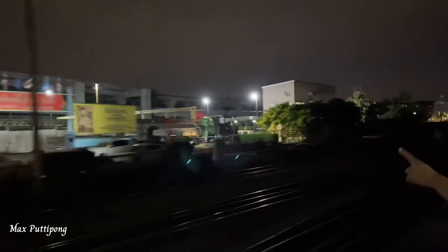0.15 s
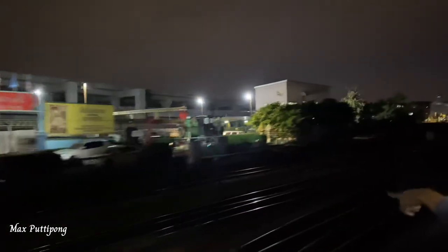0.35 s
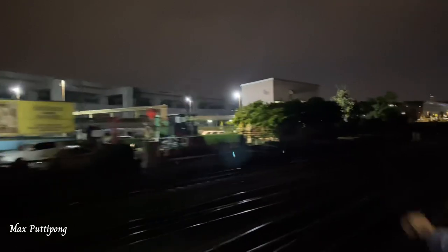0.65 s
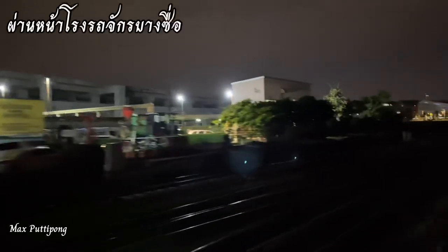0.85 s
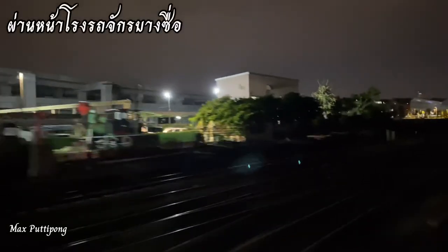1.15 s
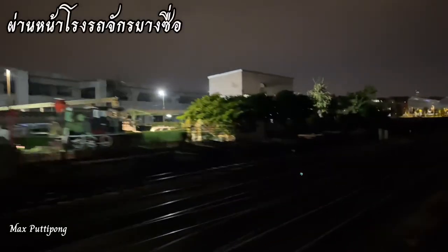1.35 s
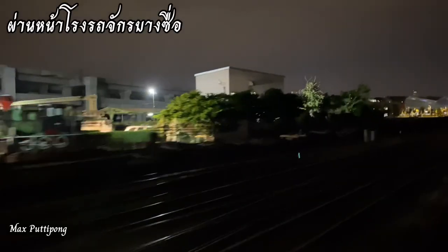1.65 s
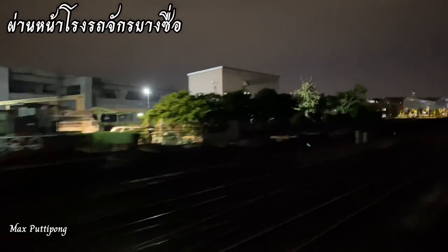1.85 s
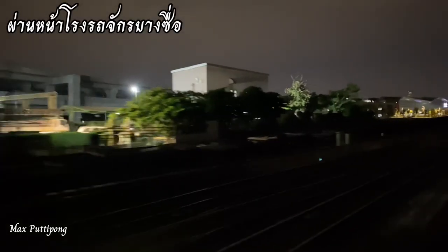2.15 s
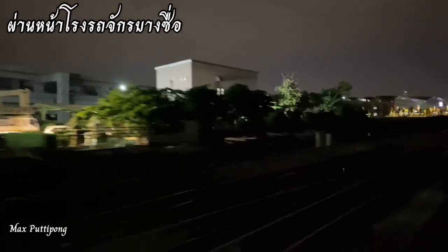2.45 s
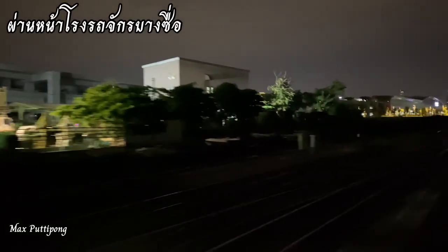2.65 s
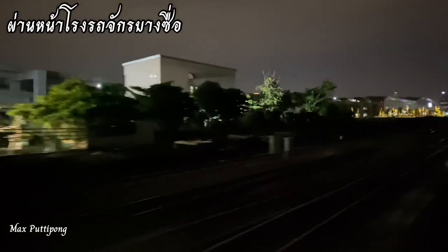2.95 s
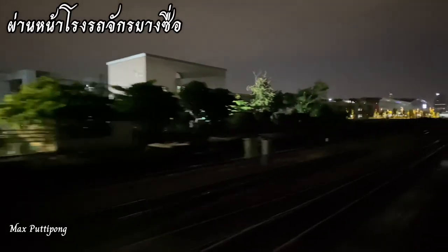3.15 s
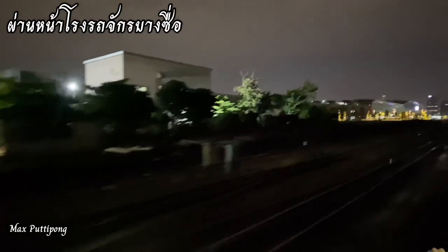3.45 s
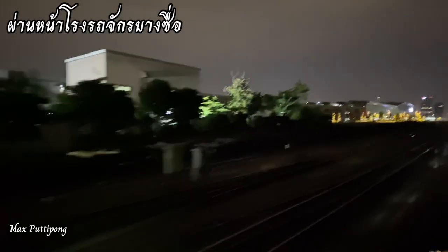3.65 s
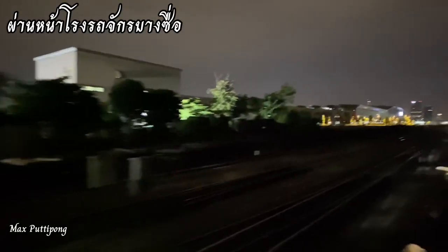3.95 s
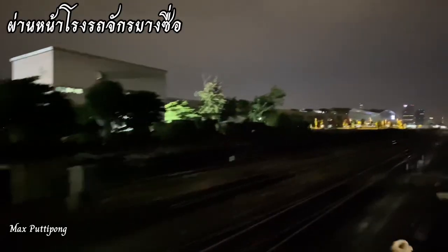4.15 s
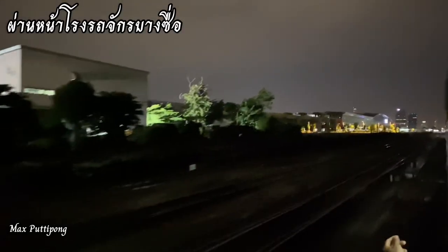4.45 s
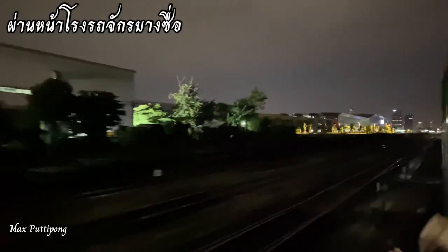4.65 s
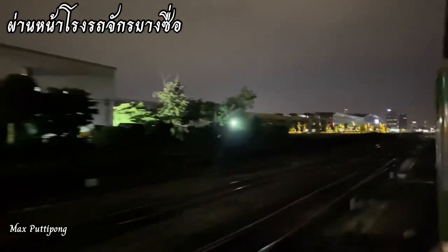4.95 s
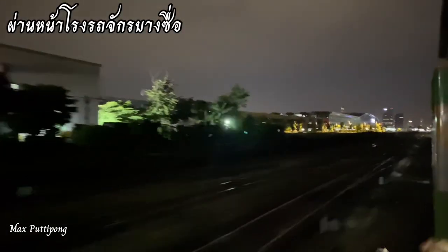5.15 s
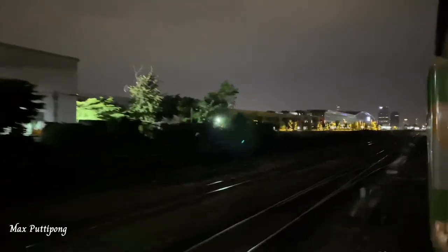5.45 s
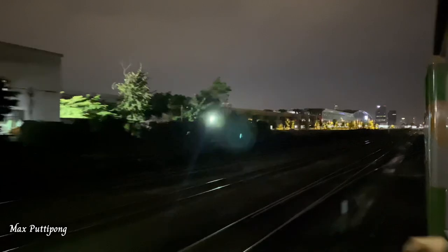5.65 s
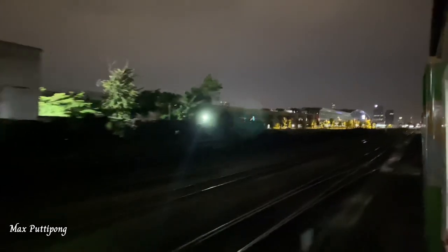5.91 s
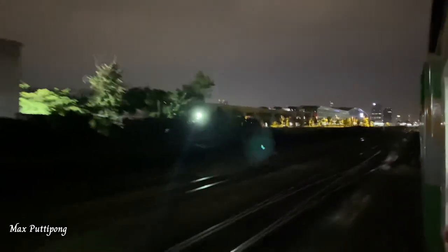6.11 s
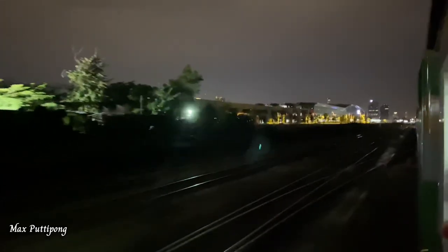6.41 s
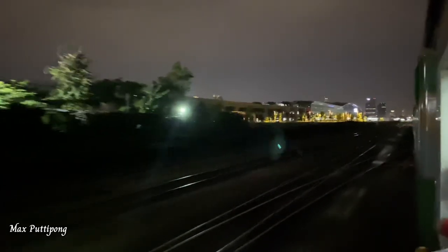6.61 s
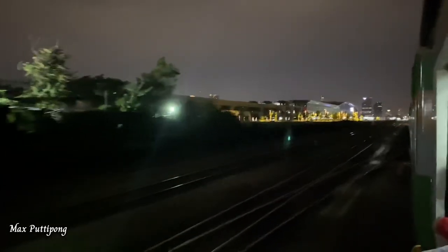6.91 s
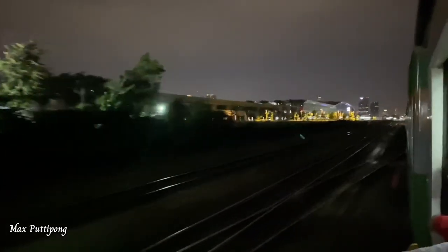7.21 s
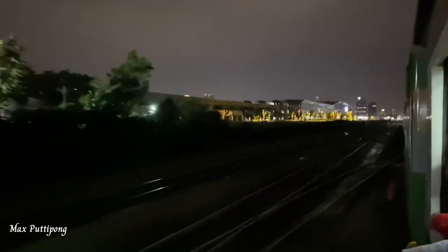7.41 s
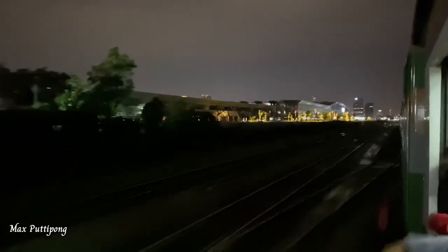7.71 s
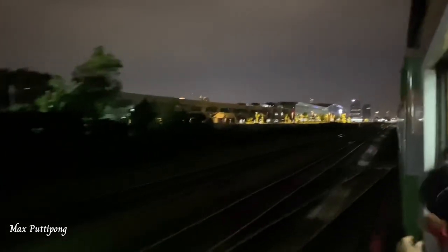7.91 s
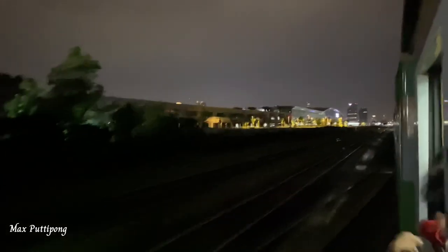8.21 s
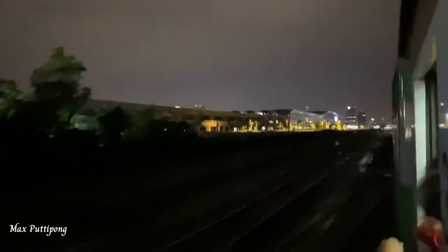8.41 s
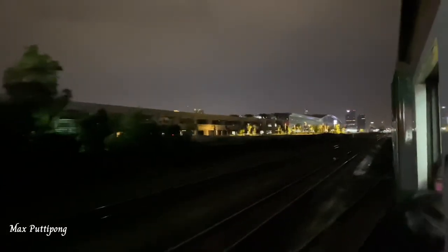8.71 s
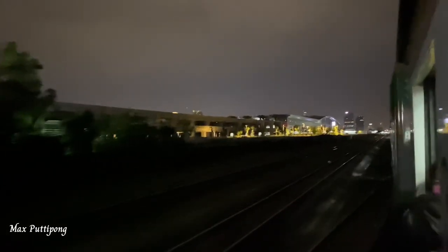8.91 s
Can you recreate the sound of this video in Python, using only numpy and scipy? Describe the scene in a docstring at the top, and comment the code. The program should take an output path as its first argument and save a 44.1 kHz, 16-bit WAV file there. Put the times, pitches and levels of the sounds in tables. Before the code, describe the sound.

Low uneven train rumble and soft wheel roar, with irregular joint clanks, dull thumps and knocks, rattling metal and tiny high squeaks.

```python
"""A train rolls slowly through a yard, heard at an open carriage window.
Throughout, shaped noise makes sway, rumble, growl, wheel roar, rail hiss and body boom; fittings chatter.
From the first moment damped tones throb in the panels, and from 0.4 s noise bursts thump as jolts.
From 0.44 s wheels hit rail joints: clank, decaying ring, clatter; loose links ring and slack knocks.
From 0.95 s flanges squeak as short sines; the rumble weakens after 4.2 s, the joints go on to the end."""
import sys
import numpy as np
from scipy import signal
from scipy.fft import rfft, irfft, next_fast_len
from scipy.io import wavfile
from scipy.ndimage import uniform_filter1d

SR = 44100
rng = np.random.default_rng(int(sys.argv[2]) if len(sys.argv) > 2 else 0)


def wav_record(signal):
    """Record a signal, one row per channel, as 16-bit PCM in the file named by sys.argv[1]."""
    frames = np.transpose(np.atleast_2d(signal))
    bounded = np.clip(frames, -1, 1)
    # unit amplitude maps onto the largest positive 16-bit level
    quanta = np.round(bounded * 32767).astype(np.int16)
    wavfile.write(sys.argv[1], SR, quanta)


N = 399987
TIME = np.arange(N) / SR  # s

# Noise spectra of the layers. Each row: frequency in Hz, relative density in dB per Hz.
# Slow heave of the carriage on its springs, running gear, bogie frame.
SWAY_SPECTRUM = [(15, -32), (30, -2), (45, 13.5), (62, 17.5), (80, 19), (150, -56)]
RUMBLE_SPECTRUM = [(35, -17), (60, -1.5), (80, 1), (135, 2.5), (200, -5.5), (300, -8.5), (600, -32.5),
                   (1500, -79)]
GROWL_SPECTRUM = [(200, -19), (400, 3.5), (470, 3), (640, -5.5), (800, -10), (1100, -23.5), (2000, -95)]
# Car body boom, and its narrower drone; columns as above, [Hz] and [dB per Hz].
BOOM_SPECTRUM = [(100, -16.5), (175, -2.5), (270, -7), (390, -7), (500, -17), (750, -16), (3000, -71)]
DRONE_SPECTRUM = [(120, -16), (200, -8.5), (295, -3), (380, -7), (500, -21.5), (750, -19.5), (3000, -72)]
# Wheels on the rail head: roar and hiss; columns as above, [Hz] and [dB per Hz].
ROAR_SPECTRUM = [(300, -28), (600, 1.5), (880, 0.5), (1150, -2.5), (1500, -7), (1750, -9.5), (2600, -11),
                 (3600, -14), (6000, -23), (12000, -114)]
HISS_SPECTRUM = [(1200, -20), (2800, -2.5), (4200, 0), (5800, -2.5), (7400, -3.3), (9000, -10),
                 (10300, -6.5), (11800, -3), (13200, -8), (15500, -8.5)]
# Jolt, joint blow, loose steel gear and its smallest parts; columns as above, [Hz] and [dB per Hz].
THUD_SPECTRUM = [(20, -46), (55, 11.5), (150, 2), (310, 4.5), (500, -5.5), (1000, -27), (3000, -77)]
CLANK_SPECTRUM = [(100, -25), (300, 13.5), (600, 8), (1000, 4), (1200, -4.5), (1550, -12), (1900, -13),
                  (4000, -11), (12000, -91)]
CLATTER_SPECTRUM = [(300, -12), (550, 1.5), (850, 3), (1250, -1.5), (1550, 0), (1800, -2.5), (2600, -1),
                    (3600, -4), (5000, -5), (7500, -11.5), (9000, -18), (11500, -16), (15500, -22)]
RATTLE_SPECTRUM = [(1500, -30), (4000, -1), (7000, 0), (9000, -4), (11500, -1.5), (15500, -8)]

# Resonances standing out of the spectra. Each row: frequency in Hz, width in Hz, lift in dB.
BODY_MODES = [(169, 89, 2.5), (241.4, 31, 4.5), (298.4, 28, 10), (337.5, 8.9, 10.5)]
WHEEL_MODES = [(618, 44, 6.4), (954, 32, 4.7), (1350, 74, 5.9), (1516, 57, 6.6), (2065, 170, 5.3),
               (2735, 58, 6.6), (3400, 110, 2.2)]
GEAR_MODES = [(1350, 330, 6.1), (2090, 100, 4.9), (2800, 180, 0.78)]
# Modes of the loose steel links. Each row: frequency in Hz, relative level in dB, t60 in seconds.
STEEL_MODES = [(1530, 3, 0.061), (1840, 0, .045), (2000, 0, 0.065), (2330, 4.5, .06), (2675, 5, 0.056),
               (3090, -5, .06), (3800, -1, .05), (4250, -1, .05), (4800, -4, 0.051)]
# Longer ring of the wheel rim. Each row: frequency in Hz, relative level in dB.
RIM_MODES = [(824, 0), (1310, -6), (1510, -8.5)]

# Likeness of the left and right channels. Each row: frequency in Hz, correlation from 0 to 1.
LIKENESS = [(50, .95), (125, .87), (290, .78), (600, .54), (1300, .43), (2200, .32), (4000, .46),
            (7000, .5), (11000, .8)]
# Left minus right. Each row: frequency in Hz, difference in dB.
BALANCE = [(60, 0), (125, 1), (270, 2), (700, .5), (1200, .8), (2200, 2.3), (4500, 1.7), (8000, 0)]
# Phase by which left leads right. Each row: frequency in Hz, lead in radians.
LEAD = [(1290, 0), (1720, .8), (3300, .2), (7500, 0), (9500, -1.85)]

# Shaking of the running gear by the track. Each row: time in seconds, relative levels of rumble
# and deep sway in dB.
SHAKE = [(0, -17, -16.5), (.5, -13.5, -17), (1.2, -18.5, -29), (1.95, -14.5, -17), (2.35, -14, -15.5),
         (2.72, -14, -24.5), (2.8, -22, -42), (3.36, -17, -39), (3.46, -14, -21), (4.2, -14.5, -25),
         (4.28, -23, -25), (5.25, -27.5, -29.5), (5.8, -27, -25.5), (6.6, -24, -26.5), (7.2, -29, -23),
         (7.95, -24, -48), (8.3, -18, -31), (8.6, -21, -45), (9.07, -23, -50)]
# Wheels on the rail head. Each row: time in seconds, relative levels of roar and hiss in dB.
ROLL = [(0, -29, -41.5), (1.3, -31.5, -46), (2.3, -29.5, -40), (3.2, -30.5, -42.5), (3.8, -29.5, -40),
        (4.25, -33, -46.5), (4.6, -31.5, -41), (5.8, -30, -43.5), (6.5, -28.5, -39.5), (7.2, -28, -38.5),
        (7.65, -28.5, -41), (8.3, -28.5, -43), (9.07, -28, -39.5)]
# Spells of car body drone. Each row: start in seconds, length in seconds, peak level in dB.
DRONES = [(-.1, 0.31, -20), (.25, 1.06, -17.5), (2.65, 0.43, -20.5), (6.25, 0.36, -19), (7.7, 1.65, -20.5)]
# Spells of bogie grinding. Each row: start in seconds, length in seconds, relative peak level in dB.
GRINDS = [(.235, .075, -13), (.3, 0.74, -25.5), (.765, .07, -19), (1.812, 0.041, -16), (2.5, 0.41, -27),
          (2.76, 0.21, -17), (2.975, 0.13, -16), (3.18, .1, -15.5), (4.88, 0.062, -20),
          (6.715, 0.07, -18.5), (8.1, 0.28, -22)]
# Body panel throbs. Each row: start in seconds, hold in seconds, pitch in Hz, relative level in dB.
THROBS = [(.01, 0.04, 302, -8.5), (0.356, 0.023, 310, -11), (0.623, .02, 303, -9.5),
          (0.941, .035, 290, -12), (2.418, 0.024, 71.6, -9), (3.454, 0.017, 75, -2),
          (4.492, 0.016, 320, -15), (4.738, 0.028, 327, -14), (6.44, 0.061, 321, -16),
          (7.211, 0.016, 311, -11.5), (8.311, 0.011, 396, -11.5), (8.435, 0.034, 320, -12.5),
          (8.601, 0.0089, 308, -12), (8.693, .03, 325, -13), (8.965, 0.026, 194, -10)]
# Bogie jolts. Each row: start in seconds, relative level in dB.
JOLTS = [(0.362, -11), (0.545, -10), (0.631, -13), (0.797, -10), (1.87, -12), (2.237, -13), (3.61, -5),
         (3.898, -6), (4.093, -6.5), (6.742, -14), (8.608, -16), (8.894, -8.5)]
# Knocks of slack in the bogie. Each row: start in seconds, relative peak in dB, pitch in Hz.
KNOCKS = [(0.54, -6, 445), (.645, -5, 624), (1.828, -3, 432), (5.59, -11, 700), (2.19, -14, 503),
          (2.244, -3.5, 595), (2.696, -14, 590), (3.194, -5, 590), (3.726, -14, 543), (3.898, -0.5, 467),
          (4.278, -2.5, 594), (4.409, -6.5, 470), (5.544, -6, 520), (5.641, -10, 800), (5.719, -15, 980),
          (6.318, -11.5, 990), (6.522, -7, 970), (6.752, -7, 630), (6.927, -14, 645), (7.119, -5, 754),
          (7.474, -6, 580), (8.778, -0.5, 830), (8.981, -3, 770)]
# Flange squeaks. Each row: start in seconds, nominal length in seconds, nominal pitch in Hz,
# relative level in dB, roughness from 0 to 1.
SQUEAKS = [(0.947, 0.034, 7500, -46, .3), (1.144, 0.037, 6570, -34, 0.3), (2.05, 0.16, 7430, -49, 0.35),
           (2.38, 0.097, 6315, -29.5, 0.22), (3.726, 0.037, 6700, -40, 0.7),
           (4.523, 0.065, 7440, -44, 0.25), (4.637, .055, 6400, -44, 0.4), (4.972, 0.035, 7400, -39, 0.25),
           (5.132, 0.043, 6880, -37, 0.3), (6.977, 0.016, 12500, -38, .8), (7.016, 0.056, 9970, -39.5, 0.4),
           (7.334, .03, 13500, -43, 0.8), (7.779, 0.025, 6150, -40.5, 0.65),
           (8.082, 0.035, 6760, -38.5, 0.9), (8.083, 0.044, 2360, -37, 0.7)]
# Loose links striking the frame. Each row: start in seconds, relative level in dB.
STROKES = [(.453, -29.5), (.542, -39), (.69, -31), (2.263, -30), (2.283, -29), (2.3, -29), (4.729, -32),
           (4.751, -34), (5.64, -35), (7.14, -31), (8.371, -25), (8.775, -21.5), (8.799, -29),
           (8.967, -22.5), (8.99, -29)]
# Wheels striking joints. Each row: start in seconds, relative clank level in dB, ring pitch in Hz,
# relative clatter level in dB, nominal clatter hold in seconds.
JOINTS = [(0.444, -19.5, 570, -27, 0.022), (0.649, -19.5, 1054, -30, 0.063), (1.631, -29, 575, -29, 0.011),
          (2.044, -21, 457, -31.5, 0.022), (2.245, -25, 603, -25.5, 0.06), (4.072, -23, 863, -38, .01),
          (4.492, -18, 900, -43, .022), (4.687, -17.5, 656, -28.5, 0.069), (5.363, -32, 1300, -34.5, 0.03),
          (5.76, -32, 820, -34.5, 0.11), (6.518, -18, 970, -37, 0.013), (6.924, -19, 1025, -31, 0.018),
          (7.116, -16.5, 856, -25.5, 0.065), (7.348, -33, 940, -32, 0.04), (7.963, -27, 726, -28.5, 0.011),
          (8.158, -23.5, 700, -30.5, 0.032), (8.368, -18, 649, -25, 0.011), (8.768, -15, 847, -24, 0.021),
          (8.964, -16.5, 588, -22.5, 0.058)]

# boom and growl levels at the reference shaking, and their slope in dB per dB of shaking
SHAKE_REF_DB = -18
BOOM_DB, BOOM_DB_PER_DB = -20, 0.4
GROWL_DB, GROWL_DB_PER_DB = -25, 0.32
# body boom after a joint: level against the clank, decay time
JOINT_BOOM_DB, JOINT_BOOM_S = -2, 0.02
# starting lags per second of clatter hold, and gain of the rattle with hold
CLATTER_LAG_S_PER_S = 0.072
RATTLE_LAG_S_PER_S, RATTLE_DB_PER_S = 0.18, 76
# link bounces: mean gap, level step per bounce, spread of mode strengths, pitch spread as a share
BOUNCE_S, BOUNCE_DB, STROKE_SPREAD_DB, DETUNE_SHARE = 0.006, -6, -5.5, .04
EDGE_HZ = 15900


def amp(db):
    """Decibels to gain."""
    return 10 ** (np.asarray(db) / 20)


def unit(x):
    """Scales to rms 1."""
    return x / np.sqrt(np.mean(x ** 2) + 1e-20)


def read(points, hz):
    """Interpolates a table on a log-frequency axis."""
    f, value = np.transpose(points)
    return np.interp(np.log(hz + 1), np.log(f + 1), value)


def curves(rows):
    """Joins each column's points by straight lines in time."""
    s, *columns = np.transpose(rows)
    return [np.interp(TIME, s, c) for c in columns]


def spells(rows):
    """Each spell swells and fades in one half-sine arch."""
    return sum(amp(db) * np.sin(np.pi * np.clip((TIME - s) / length, 0, 1)) for s, length, db in rows)


def burst(rise, hold, fall):
    """Blow envelope in seconds: linear rise, level until hold, exponential fall."""
    t = TIME[:SR]
    return np.minimum(t / max(rise, 1e-4), 1) * np.exp(-np.maximum(t - hold, 0) / max(fall, 1e-3))


def placed(sounds):
    """Sums (start time, sound) pairs on one track."""
    track = np.zeros(N)
    for s, sound in sounds:
        part = track[max(round(s * SR), 0):][:len(sound)]
        part += sound[:len(part)]
    return track


def drift(rate_hz):
    """Lowpassed noise of rms 1, slower than about the given rate."""
    size = next_fast_len(N, real=True)
    hz = np.fft.rfftfreq(size, 1 / SR)
    lowpassed = rfft(rng.standard_normal(N), size) / (1 + (hz / rate_hz) ** 4)
    return unit(irfft(lowpassed, size)[:N])


def vibration(spectrum, modes=(), grain_db=0, grain_hz=150):
    """Grainy random shaking, coloured by a part's spectrum and resonances, in stereo at rms 1."""
    size = next_fast_len(N, real=True)
    hz = np.fft.rfftfreq(size, 1 / SR)
    grain = amp(grain_db * np.minimum(drift(grain_hz), np.sqrt(2)))
    left, other = rfft(rng.standard_normal((2, N)) * grain, size)
    like = np.clip(read(LIKENESS, hz), -1, 1)
    right = (like * left + np.sqrt(1 - like ** 2) * other) * np.exp(-1j * read(LEAD, hz))
    side = amp(read(BALANCE, hz) / 2)
    colour_db = read(spectrum, hz)
    for f, width, lift in modes:
        colour_db = colour_db + lift / (1 + (2 * (hz - f) / width) ** 2)
    return unit(irfft(np.array([left * side, right / side]) * amp(colour_db), size)[:, :N])


def steel(low_hz, high_hz, ring_time, count):
    """Many close modes of struck steel, of random pitch and of random strength in each channel."""
    t = TIME[:SR // 8]
    hz = low_hz * (high_hz / low_hz) ** ((np.arange(count) + rng.random(count)) / count)
    strength = rng.standard_normal((2, count)) + 1j * rng.standard_normal((2, count))
    ring = (strength @ np.exp(2j * np.pi * hz[:, None] * t)).real * np.exp(-t / ring_time)
    return ring / np.linalg.norm(ring, axis=1, keepdims=True)


def fittings():
    """Loose window and door fittings chatter faintly at random, each ringing briefly, as the roar rises."""
    chatter = np.zeros((2, N))
    for _ in range(4):
        strength = amp(3 * np.minimum(rng.exponential(1, N), 3))
        taps = strength * (rng.random(N) < 40 / SR)  # 40 per second on average
        ring = steel(1000, 2900, ring_time=.004, count=12)[:, :SR // 30]
        chatter += signal.oaconvolve(taps[None], ring, axes=1)[:, :N]
    roar_db, _ = curves(ROLL)
    return amp(roar_db - 8.5) * unit(chatter)


def running_gear(bumps):
    """Uneven rails shake the running gear into a grainy rumble; the carriage heaves on its springs."""
    rumble_db, sway_db = curves(SHAKE)
    sway = amp(sway_db - 0.3) * vibration(SWAY_SPECTRUM)
    rumble_gain = amp(rumble_db + 1.2 * bumps - 0.25)
    return sway + rumble_gain * vibration(RUMBLE_SPECTRUM, grain_db=3.0, grain_hz=30)


def bogie_growl(bumps):
    """The bogie frame growls with the shaking and grinds in spells."""
    shake_db, _ = curves(SHAKE)
    following = amp(GROWL_DB + GROWL_DB_PER_DB * (shake_db - SHAKE_REF_DB))
    level = np.hypot(following, spells(GRINDS)) * amp(1.8 * bumps - .5)
    return level * vibration(GROWL_SPECTRUM, grain_db=2.2, grain_hz=45)


def wheels_on_rail(bumps):
    """The contact patch roars through the wheel modes and hisses in the treble."""
    roar_db, hiss_db = curves(ROLL)
    roar_gain = amp(roar_db + 1.5 + 1.4 * bumps)
    roar = roar_gain * vibration(ROAR_SPECTRUM, WHEEL_MODES, grain_db=-0.25, grain_hz=70)
    hiss_gain = amp(hiss_db + 2.3 + 2 * bumps + .9 * drift(rate_hz=14))
    hiss = hiss_gain * vibration(HISS_SPECTRUM, grain_db=1.4, grain_hz=160)
    return roar + hiss


def rolling():
    """Rough spots on the rail head move rumble, growl, roar and hiss together."""
    bumps = np.tanh(drift(rate_hz=13.0))
    return fittings() + running_gear(bumps) + bogie_growl(bumps) + wheels_on_rail(bumps)


def car_body():
    """The body booms in quick lumps with the shaking, drones in spells, and rings on after each joint."""
    shake_db, _ = curves(SHAKE)
    shaken = amp(BOOM_DB + BOOM_DB_PER_DB * (shake_db - SHAKE_REF_DB))
    ring_on = burst(rise=0.0063, hold=0.032, fall=JOINT_BOOM_S)
    struck = placed((s, amp(db + JOINT_BOOM_DB) * ring_on) for s, db, *_ in JOINTS)
    drone = spells(DRONES) * vibration(DRONE_SPECTRUM, BODY_MODES, grain_db=1.0, grain_hz=3.8)
    boom = vibration(BOOM_SPECTRUM, BODY_MODES, grain_db=3.6, grain_hz=55)
    return np.hypot(shaken, struck) * boom + drone


def throbs():
    """A lurch pumps one body panel for some cycles, a weaker neighbour beating at 1.5 times its pitch."""
    turn, tones = 2 * np.pi * TIME[:SR], []
    for s, hold, hz, db in THROBS:
        phase = hz * turn + 2 * np.pi * rng.random()
        panels = np.sin(phase) + amp(-10.0) * np.sin(1.5 * phase)
        tones.append((s, amp(db) * burst(rise=0.0046, hold=hold, fall=0.0044) * panels))
    halves_db = read(BALANCE, 300) * np.array([[.5], [-.5]])  # left, right
    return placed(tones) * amp(halves_db)


def jolts():
    """The bogie bottoms on its springs and thumps the floor."""
    thump = burst(rise=0.0011, hold=0.01, fall=0.0051)
    push = placed((s, amp(db) * thump) for s, db in JOLTS)
    return amp(1.0) * push * vibration(THUD_SPECTRUM)


def knocks():
    """Slack taken up in the bogie: a heavily damped knock with an overtone and a rough crunch."""
    turn = 2 * np.pi * TIME[:SR]
    shape = burst(rise=0.0013, hold=0.002, fall=0.0034)
    tones = []
    for s, db, hz in KNOCKS:
        tone = np.sin(hz * turn) + amp(-10.5) * np.sin(1.48 * hz * turn)
        tones.append((s, amp(db) * shape * tone))
    crunch_shape = burst(rise=0.0016, hold=0.0011, fall=0.0068)
    crunch = placed((s, amp(db) * crunch_shape) for s, db, _ in KNOCKS) * vibration(ROAR_SPECTRUM)
    return amp(-5.3) * placed(tones) + amp(-17.5) * crunch


def squeak(s, length, hz, db, rough):
    """A flange sticks and slips and sings one wheel mode; rough slips scoop up to pitch and jitter."""
    swell = burst(rise=0.0058, hold=length * 0.84, fall=0.009)
    waver, flutter = (unit(uniform_filter1d(n, size=50)) for n in rng.standard_normal((2, SR)))
    scoop = .04 * np.exp(-TIME[:SR] / .008)
    bend = .001 + rough * (.016 * waver - scoop)
    phase = 2 * np.pi * np.cumsum(hz * (1 + bend)) / SR
    return s, amp(db + 5.9 * rough * flutter) * swell * np.sqrt(2) * np.sin(phase)


def flanges():
    """Squeaks arrive directly and scattered off ballast and car side, differently in each channel."""
    direct = placed(squeak(*row) for row in SQUEAKS)
    t = TIME[:SR // 4]
    scatter = rng.standard_normal((2, len(t))) * np.exp(-t / 0.04)
    scatter /= np.linalg.norm(scatter, axis=1, keepdims=True)
    scattered = signal.fftconvolve(direct[None], scatter, axes=1)[:, :N]
    return amp(0.5) * direct + scattered


def strokes():
    """Loose links slam on the frame and bounce; each contact rings the steel modes unevenly, off pitch."""
    t = TIME[:SR // 10]
    hz, db, t60 = np.transpose(STEEL_MODES)[:, :, None]
    decay = amp(db - 60 * t / np.maximum(t60, .005)) * np.minimum(t / .001, 1)
    count = len(hz)
    left, right = [], []
    for s, level in STROKES:
        gaps = BOUNCE_S * (.5 + rng.random(size=4))
        for k, delay in enumerate(np.cumsum(gaps) - gaps[0]):
            detuned_hz = hz * (1 + DETUNE_SHARE * rng.uniform(-1.02, 1, hz.shape))
            modes = decay * np.exp(2j * np.pi * detuned_hz * t)
            spread = amp(STROKE_SPREAD_DB * rng.uniform(-0.88, 1, count))
            shared = spread * np.exp(2j * np.pi * rng.random(count))
            for channel in left, right:
                strength = shared * np.exp(1j * np.pi * rng.random(count))
                channel.append((s + delay, amp(level + k * BOUNCE_DB) * (strength @ modes).real))
    return np.array([placed(left), placed(right)])


def loose_gear():
    """Loose steel gear clatters just after each joint, jangles, and rattles in its smallest parts."""
    shaking, fine = [], []
    for s, _, _, db, hold in JOINTS:
        # the longer the shaking, the later it starts and the slower it builds and settles
        shape = burst(rise=.0012 + .15 * hold, hold=.85 * hold, fall=.021 + .5 * hold)
        shaking.append((s + CLATTER_LAG_S_PER_S * hold, amp(db) * shape))
        # the smallest parts start last, in crisp grains, strongest under long shaking
        fine_shape = burst(rise=0.0034 + 0.13 * hold, hold=1.04 * hold, fall=0.016)
        fine.append((s + RATTLE_LAG_S_PER_S * hold, amp(db + RATTLE_DB_PER_S * hold) * fine_shape))
    clatter = placed(shaking) * vibration(CLATTER_SPECTRUM, GEAR_MODES, grain_db=3.0, grain_hz=200)
    ring = steel(1100, 4800, ring_time=0.007, count=20)
    jangle = amp(-10) * signal.oaconvolve(clatter, ring, axes=1)[:, :N]
    rattle = placed(fine) * vibration(RATTLE_SPECTRUM, grain_db=4.5, grain_hz=600)
    return amp(1.7) * (clatter + jangle) + amp(-12) * rattle


def wheel_ring(s, db, hz):
    """The blow rings a cluster of wheel and axle modes; the rim sings on a little longer."""
    def tone(f, level_db):
        return amp(level_db) * np.sin(2 * np.pi * (f * TIME[:SR] + rng.random()))

    cluster = tone(hz, 9) + tone(1.09 * hz, 6) + tone(1.58 * hz, 0)
    rim = sum(tone(f, level_db) for f, level_db in RIM_MODES)
    cluster = cluster * burst(rise=0.0073, hold=0.0072, fall=0.016)
    rim = rim * burst(rise=.004, hold=.006, fall=0.044)
    return s, amp(db) * (cluster + rim)


def joints():
    """Each rail joint clanks and rings the wheel and sets the loose gear clattering."""
    shape = burst(rise=0.00054, hold=0.031, fall=0.038)
    blows = placed((s, amp(db) * shape) for s, db, *_ in JOINTS)
    clank = amp(-1) * blows * vibration(CLANK_SPECTRUM, WHEEL_MODES, grain_db=2.5, grain_hz=150)
    ring = amp(-8.5) * placed(wheel_ring(s, db, hz) for s, db, hz, *_ in JOINTS)
    return clank + ring + loose_gear()


def scene():
    """Everything under the window."""
    return rolling() + car_body() + throbs() + jolts() + knocks() + flanges() + strokes() + joints()


def record(dry):
    """Rounds off the highest peaks, then limits the band."""
    rounded = dry / (1 + (dry / .95) ** 8) ** (1 / 8)
    lowpass = signal.firwin(511, EDGE_HZ, window=("kaiser", 9), fs=SR)
    return signal.oaconvolve(rounded, lowpass[None], "same")


dry = scene()
out = record(dry)
wav_record(out)
```